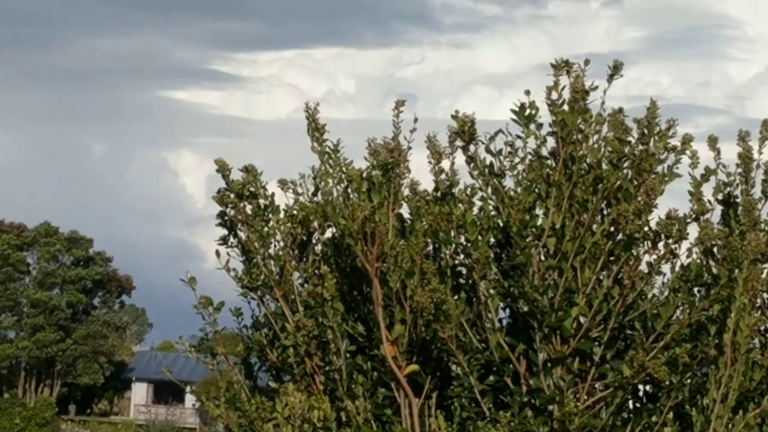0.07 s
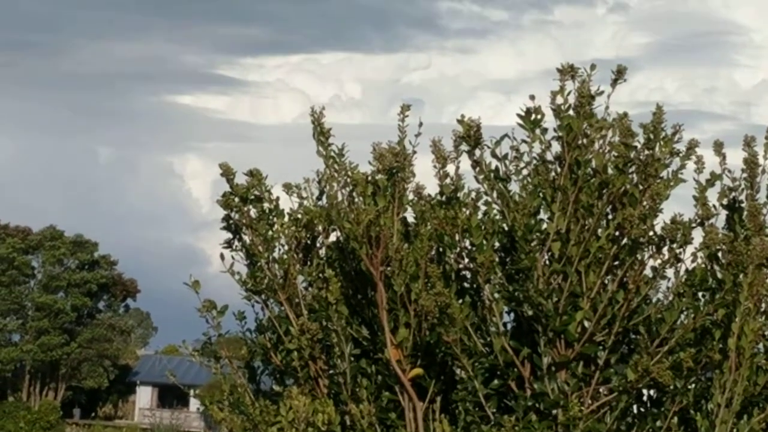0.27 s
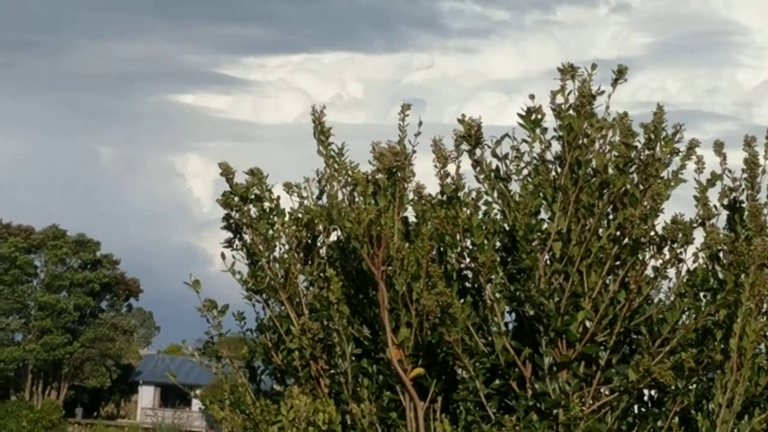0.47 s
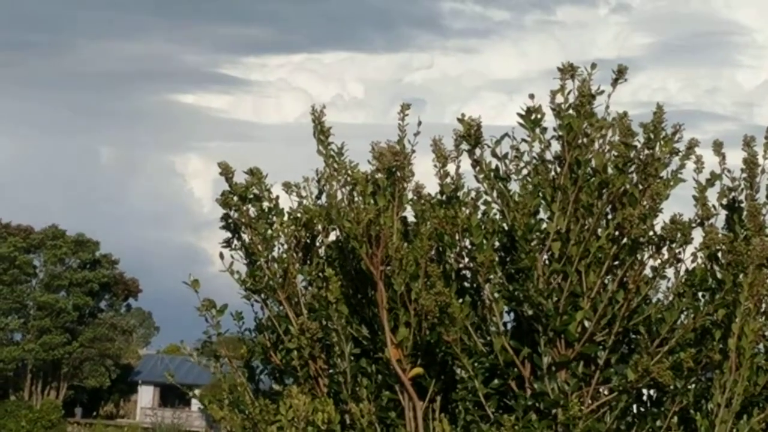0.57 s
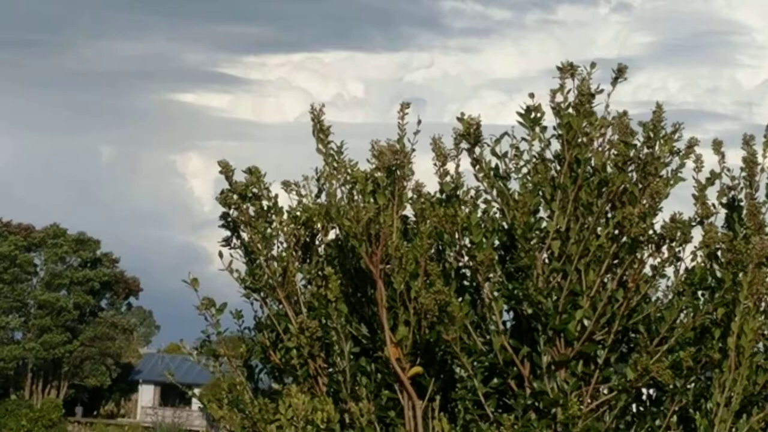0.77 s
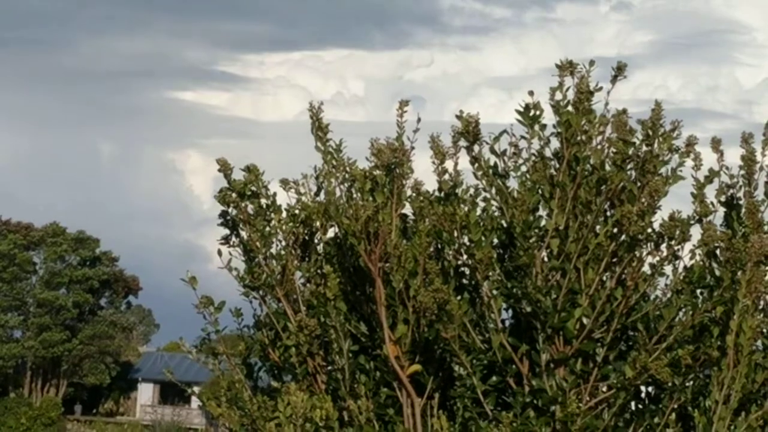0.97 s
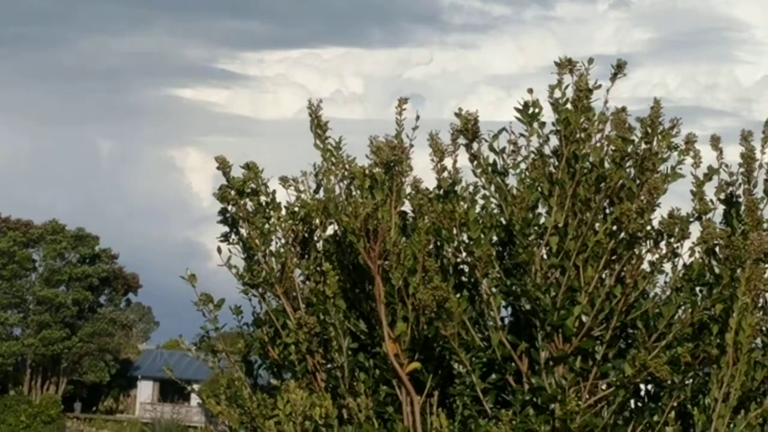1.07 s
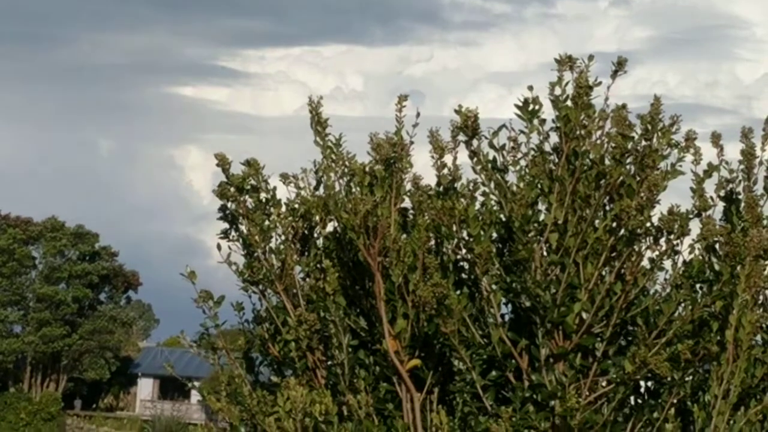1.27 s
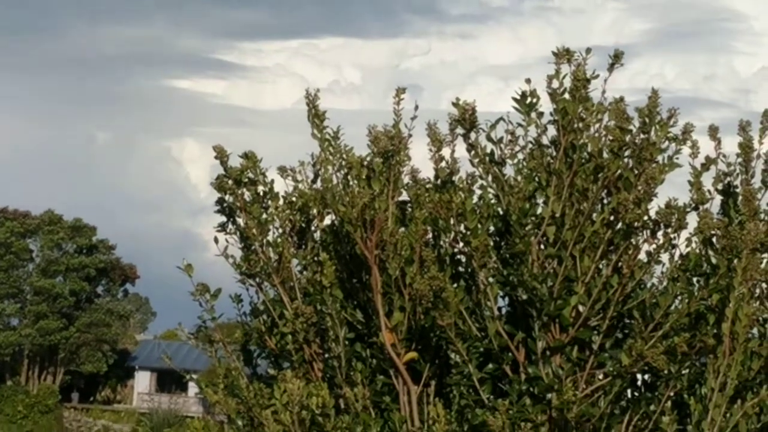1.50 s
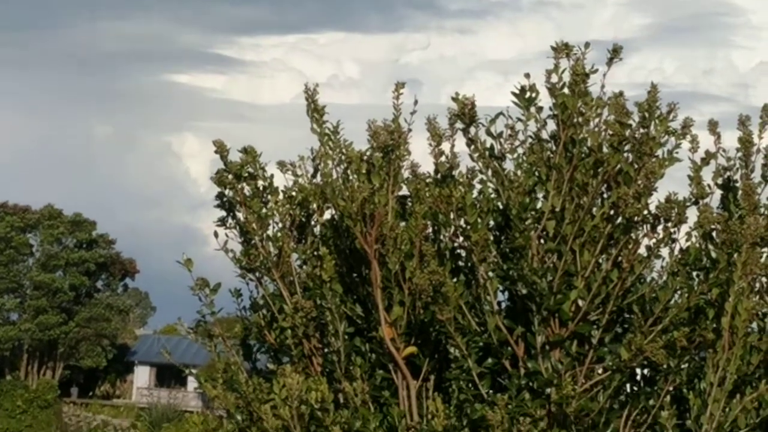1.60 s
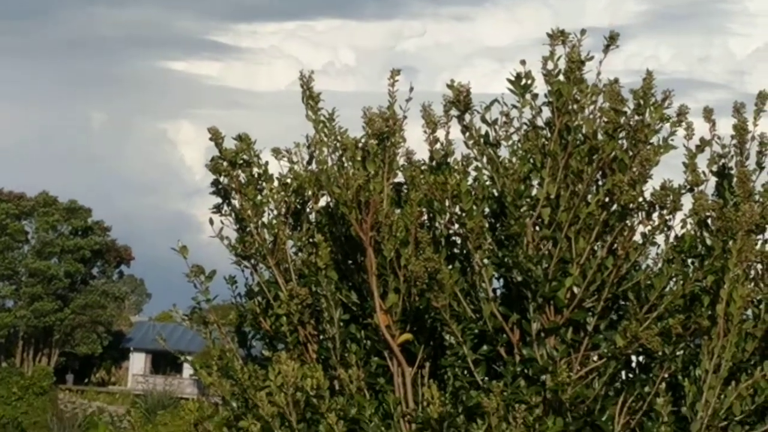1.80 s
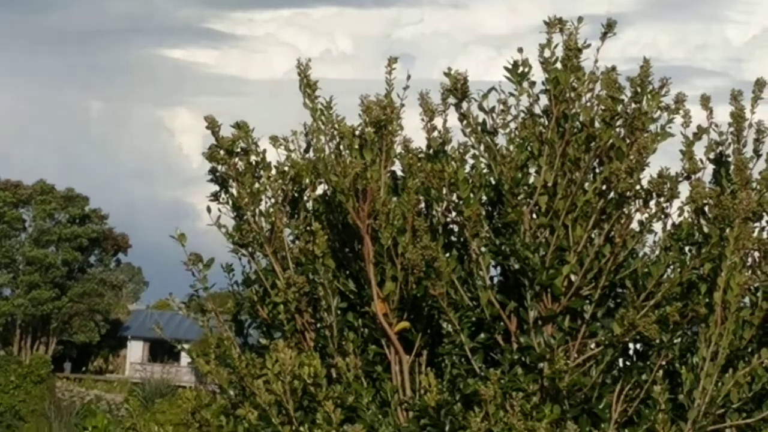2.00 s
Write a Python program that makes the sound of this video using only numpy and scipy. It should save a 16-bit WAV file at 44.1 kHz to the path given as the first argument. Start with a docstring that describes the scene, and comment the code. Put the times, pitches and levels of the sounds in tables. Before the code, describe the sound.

Faint chirps and quick falling whistles come from small birds among garden trees and bushes. Soft wind puffs hit the microphone, mostly in the first half, while a distant rumble continues and a gentle hiss rises late.

```python
"""A garden. Small birds chirp some way off; trees and bushes scatter and smear their falling whistles.
Light wind bumps the microphone in soft low puffs. Behind it lie a far rumble and drone, open air,
a faint twitter, a thin high whine, brief rustles and a hiss that swells toward the end."""
import sys
import numpy as np
from scipy import signal
from scipy.fft import rfft, irfft, next_fast_len
from scipy.io import wavfile
from scipy.ndimage import uniform_filter1d, map_coordinates

SR = 44100
rng = np.random.default_rng(int(sys.argv[2]) if len(sys.argv) > 2 else 0)


def unload_audio(sound):
    """Save the sound as a 16-bit wav file, at the path given as the first command line argument."""
    columns = np.transpose(np.atleast_2d(sound))
    # keep every value between -1 and 1, then stretch to whole-number steps
    steps = np.round(np.clip(columns, -1, 1) * 32767)
    wavfile.write(sys.argv[1], SR, steps.astype(np.int16))


N = 90404


def amp(db):
    """Decibels to gain."""
    return 10 ** (np.asarray(db) / 20)


def unit(x):
    """Scale to rms 1."""
    return x / np.sqrt(np.mean(x ** 2) + 1e-20)


def clock():
    """Sample times in seconds."""
    return np.arange(N) / SR


def curves(rows):
    """Per-sample curve of each column after the time."""
    time_s, *columns = np.transpose(rows)
    return [np.interp(clock(), time_s, column) for column in columns]


def bell(x, centre, width):
    """Gaussian of height 1."""
    return np.exp(-.5 * ((x - centre) / width) ** 2)


def wobble(rate_hz):
    """Smooth random curve, rate_hz knots a second."""
    return map_coordinates(rng.standard_normal(N // 8), [clock() * rate_hz], mode="mirror")


def filtered(x, response):
    """Filter x by a gain function of frequency."""
    size = next_fast_len(N + SR // 2)
    return irfft(rfft(x, size) * response(np.fft.rfftfreq(size, 1 / SR)), size)[:N]


def coloured_noise(spectrum, patchy_db):
    """Shaped noise, rms 1, with random gain patches in time and frequency."""
    bins = signal.stft(rng.standard_normal(N), nperseg=512)[2]
    patches = uniform_filter1d(rng.standard_normal(bins.shape), size=5, axis=0)
    patches = unit(uniform_filter1d(patches, size=10, axis=1))
    noise = signal.istft(bins * amp(patchy_db * patches), nperseg=512)[1][:N]
    freq_hz, gain_db = np.transpose(spectrum)
    return unit(filtered(noise, lambda hz: amp(np.interp(np.log(hz + 1), np.log(freq_hz + 1), gain_db))))


def noise_band(centre_hz, width_hz):
    """Gaussian band of noise, rms 1."""
    return unit(filtered(rng.standard_normal(N), lambda hz: bell(hz, centre_hz, width_hz)))


# Rumble spectrum: freq_hz, gain_db
RUMBLE_SPECTRUM = [(20, -51), (35, -11.5), (57, 5), (80, -6), (120, -12), (170, -17.5), (300, -44.5)]
# Rumble envelope: time_s, level_db
RUMBLE_LEVEL = [(0, -59), (.45, -55.5), (.57, -63), (.75, -57), (1.4, -58.5), (1.55, -60), (1.78, -59),
                (2.05, -58.5)]
def rumble():
    """Far rumble: deep noise, drifting in level."""
    level_db, = curves(RUMBLE_LEVEL)
    return amp(level_db) * coloured_noise(RUMBLE_SPECTRUM, patchy_db=.5)


# Open-air spectrum: freq_hz, gain_db
AIR_SPECTRUM = [(100, -26), (150, -3.5), (217, -0.5), (300, -5), (430, -4), (550, -5.5), (1000, -8.5),
                (2100, -14), (2650, -16.5), (3550, -14), (6700, -35.5), (9500, -30), (15500, -70)]
def air(level_db=-61.5):
    """Open air: steady broad noise."""
    return amp(level_db) * coloured_noise(AIR_SPECTRUM, patchy_db=.5)


# Twitter spectrum: freq_hz, gain_db
TWITTER_SPECTRUM = [(2400, -54), (2900, -11.5), (3400, -4.5), (4300, -4.5), (5200, -11.5), (6200, -40)]
# Twitter envelope: time_s, level_db
TWITTER_LEVEL = [(0, -65), (.1, -69.5), (.16, -79.5), (.33, -67), (.55, -66), (.75, -72), (.9, -69.5),
                 (1.17, -69), (1.26, -77.5), (1.33, -74.5), (1.62, -67), (1.69, -73), (2.05, -73)]
def twitter():
    """More distant birds, blurred into flickering treble noise."""
    level_db, = curves(TWITTER_LEVEL)
    return amp(level_db + wobble(16)) * coloured_noise(TWITTER_SPECTRUM, patchy_db=3)


# Drone envelope: time_s, level_db
DRONE_LEVEL = [(0, -89), (1, -69.5), (2.05, -66)]
def drone():
    """Far drone: a narrow low band, fading in."""
    level_db, = curves(DRONE_LEVEL)
    return amp(level_db) * noise_band(centre_hz=214, width_hz=23)


# Whine track: time_s, pitch_hz, level_db
WHINE_TRACK = [(0, 8130, -88.5), (.6, 8130, -83.5), (.67, 8500, -85), (1, 8130, -85), (1.5, 8170, -90),
               (2.05, 8160, -95)]
def whine(waver_hz=70, flicker_db=2.2):
    """Thin, wavering high tone."""
    pitch_hz, level_db = curves(WHINE_TRACK)
    phase = 2 * np.pi * np.cumsum(pitch_hz + waver_hz * wobble(150)) / SR
    return amp(level_db + flicker_db * wobble(43.1)) * np.sqrt(2) * np.sin(phase)


# Eddies at the microphone: peak_s, level_db, pitch_hz, width_s
WIND_PUFFS = [(.005, -45.5, 47.4, 0.0069), (0.063, -49.5, 71, 0.0072), (.125, -50, 59.6, 0.011),
              (0.186, -51, 73, 0.0094), (0.255, -33, 56.2, 0.014), (0.293, -39.5, 86.4, 0.014),
              (0.315, -36, 61.5, 0.022), (0.37, -44, 69, .008), (0.44, -33, 97, 0.0063),
              (0.464, -37, 55.4, 0.012), (0.85, -39.5, 59.3, .012), (0.897, -40.5, 73, 0.013),
              (.932, -39, 85.5, 0.0094), (.988, -34, 65, 0.01), (1.053, -45, 52, 0.045),
              (1.168, -41, 66, 0.012), (1.241, -46.5, 52, 0.015), (1.871, -40, 60.4, 0.0095)]
def wind(rough_rad=.3):
    """Each eddy briefly swings the pressure at the microphone."""
    t, out = clock(), np.zeros(N)
    for peak_s, level_db, pitch_hz, width_s in WIND_PUFFS:
        phase = 2 * np.pi * (pitch_hz * (t - peak_s) + rng.random()) + rough_rad * wobble(90)
        out += amp(level_db) * bell(t, peak_s, width_s) * np.sqrt(2) * np.sin(phase)
    return out


def bird_note(start_s, length_s, first_hz, middle_hz, last_hz, bend_hz, octave_db, attack_s):
    """Whistle gliding through three pitches, with a weak octave."""
    t = clock() - start_s
    arc = np.polyfit([0, .5, 1], [first_hz, middle_hz, last_hz], 2)
    pitch_hz = np.polyval(arc, np.clip(t / length_s, 0, 1)) + bend_hz
    phase = 2 * np.pi * np.cumsum(pitch_hz) / SR
    envelope = np.clip(t / attack_s, 0, 1) * np.clip((length_s - t) / .008, 0, 1)  # 8 ms release
    return np.sqrt(2) * envelope * (np.sin(phase) + amp(octave_db) * np.sin(2 * phase))


def foliage(direct, scatter_db, scatter_t60_s=.06, echo_db=-7, echo_t60_s=.55):
    """Direct sound plus quick scatter from bushes and a longer echo from trees."""
    t = np.arange(SR // 2) / SR
    paths = np.zeros(len(t))
    for level_db, t60_s in [(scatter_db, scatter_t60_s), (echo_db, echo_t60_s)]:
        tail = rng.standard_normal(len(t)) * np.exp(-np.log(1000) * t / t60_s)
        paths += amp(level_db) * tail / np.linalg.norm(tail)
    return direct + signal.fftconvolve(direct, paths)[:N]


# Clear bird notes: start_s, length_s, first_hz, middle_hz, last_hz, level_db
WHISTLES = [(0.058, 0.035, 3900, 3850, 3800, -65), (0.187, 0.039, 4220, 4080, 3610, -63),
            (0.227, .026, 3306, 3640, 3370, -56), (.248, 0.035, 3430, 3150, 3020, -64),
            (0.286, 0.069, 4540, 4390, 4220, -68), (0.287, 0.017, 6000, 5850, 5500, -76),
            (0.566, .042, 7000, 5990, 5830, -71), (0.628, .068, 3680, 3327, 3050, -69),
            (0.634, .03, 5180, 5220, 5280, -71), (0.711, 0.041, 5200, 5400, 6200, -73),
            (.921, 0.051, 5580, 5670, 5100, -62), (0.924, 0.052, 6140, 6400, 6200, -69),
            (1.106, 0.042, 3320, 3940, 4120, -63.5), (1.165, 0.029, 3250, 3096, 3250, -65),
            (1.183, 0.039, 3600, 3830, 3670, -69.5), (1.286, 0.02, 3800, 3810, 3690, -68),
            (1.488, .032, 5180, 5200, 5370, -71.5), (1.527, 0.025, 5800, 5900, 6160, -71.5),
            (1.542, 0.039, 4930, 5020, 5000, -63.5), (1.57, 0.0276, 4830, 4150, 3800, -66.5),
            (1.61, 0.025, 3560, 3800, 4360, -60.5), (1.627, 0.023, 4450, 3540, 2930, -60),
            (1.702, 0.019, 5380, 5570, 5750, -70), (1.714, 0.025, 4240, 4580, 4730, -58),
            (1.936, .025, 3570, 3470, 3520, -65.5), (1.966, 0.058, 3320, 3300, 3160, -67.5)]
def bird_whistles(waver_hz=45.1):
    """Clear, slightly wavering notes, each by its own path through the leaves."""
    out = np.zeros(N)
    for *glide, level_db in WHISTLES:
        whistle = bird_note(*glide, waver_hz * wobble(250), octave_db=-40, attack_s=.007)
        out += amp(level_db) * foliage(whistle, scatter_db=-8)
    return out


# Buzzy bird notes: start_s, length_s, first_hz, middle_hz, last_hz, level_db, depth_hz, octave_db
SLURS = [(0.411, 0.075, 5450, 5340, 5120, -67, 204, -34), (0.472, .09, 7270, 7350, 7000, -78, 378, -34),
         (.585, 0.077, 4050, 3700, 3290, -76, 178, -30), (0.792, 0.08, 3650, 3510, 3440, -70.5, 322, -31),
         (0.949, 0.087, 5865, 4835, 3954, -59.5, 452, -17), (0.951, 0.11, 6250, 5720, 5110, -69, 504, -21),
         (1.009, 0.096, 4070, 3590, 3166, -60.5, 292, -24),
         (1.558, .085, 4680, 4040, 3480, -63.5, 604, -32), (1.711, 0.096, 4455, 4172, 3860, -59, 512, -26),
         (1.795, 0.082, 4000, 3650, 3180, -64.5, 398, -32)]
def bird_slurs(flutter_rate_hz=680, flutter_db=1):
    """Falling notes roughened by fast pitch and level flutter, heard through the leaves."""
    out = np.zeros(N)
    for *glide, level_db, depth_hz, octave_db in SLURS:
        bend_hz = depth_hz * np.tanh(2 * wobble(flutter_rate_hz))
        flutter_gain = amp(-flutter_db * wobble(flutter_rate_hz))
        slur = flutter_gain * bird_note(*glide, bend_hz, octave_db, attack_s=.018)
        out += amp(level_db) * foliage(slur, scatter_db=-5)
    return out


# Rustles: peak_s, width_s, centre_hz, width_hz, level_db
RUSTLES = [(0.53, 0.0054, 10900, 2970, -71), (.555, 0.0088, 11000, 3000, -73),
           (.59, 0.017, 10300, 2500, -76), (.69, 0.033, 9400, 600, -79), (1.571, 0.065, 2150, 200, -67),
           (1.64, 0.02, 510, 221, -60.5)]
def rustles():
    """Brief soft swells of band noise."""
    return sum(amp(level_db) * bell(clock(), peak_s, width_s) * noise_band(centre_hz, width_hz)
               for peak_s, width_s, centre_hz, width_hz, level_db in RUSTLES)


# Hiss spectrum: freq_hz, gain_db
HISS_SPECTRUM = [(800, -18), (2000, 1.5), (4000, -1), (7000, -5), (10000, -3.5), (12500, 0), (15500, -6)]
# Hiss envelope: time_s, level_db
HISS_LEVEL = [(0, -102), (.6, -77), (1.2, -75), (1.45, -67.5), (1.75, -63.5), (1.95, -61.5), (2.05, -63.5)]
def hiss():
    """Fine hiss, swelling toward the end."""
    level_db, = curves(HISS_LEVEL)
    return amp(level_db) * coloured_noise(HISS_SPECTRUM, patchy_db=1.8)


def scene():
    """All sources at one microphone."""
    background = rumble() + air() + twitter() + drone() + whine()
    return (background + wind() + bird_whistles() + bird_slurs() + rustles() + hiss())[None]


def record(dry, low_cut_hz=29, top_hz=15800):
    """Recorder: steep bass cut, hard band limit."""
    return filtered(dry[0], lambda hz: (hz < top_hz) / (1 + (low_cut_hz / (hz + 1)) ** 10))[None]


dry = scene()
out = record(dry)
unload_audio(out)
```